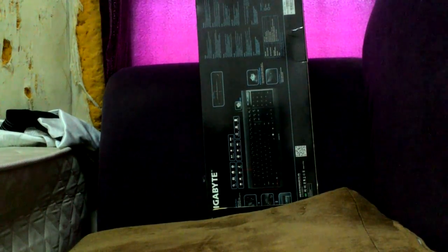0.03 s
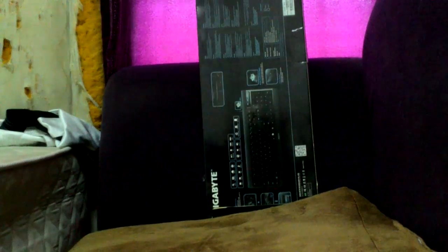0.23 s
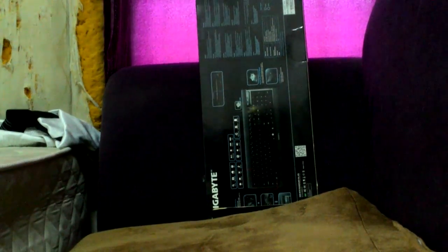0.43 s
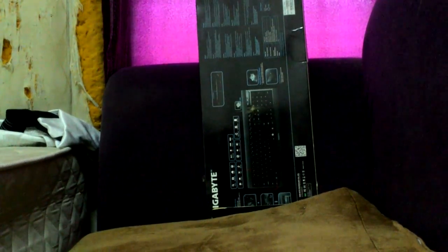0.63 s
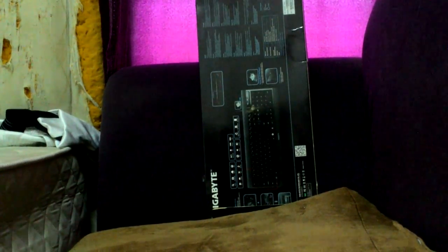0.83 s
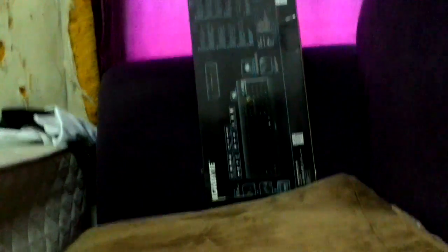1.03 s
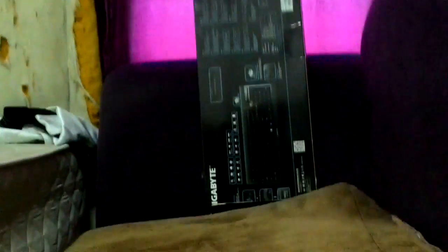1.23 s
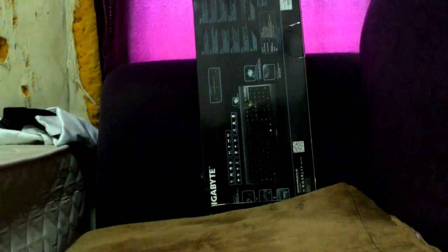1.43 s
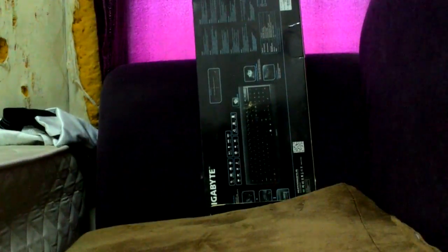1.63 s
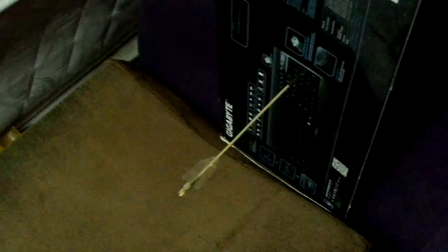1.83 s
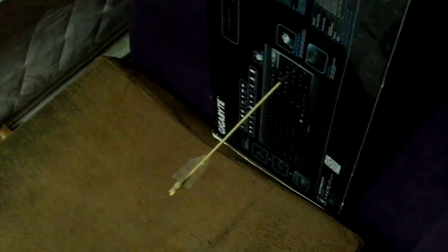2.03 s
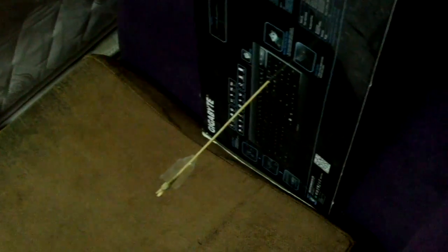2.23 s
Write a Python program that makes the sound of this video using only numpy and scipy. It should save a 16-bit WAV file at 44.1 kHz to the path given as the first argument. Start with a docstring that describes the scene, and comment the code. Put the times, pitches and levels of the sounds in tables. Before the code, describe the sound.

In a quiet furnished room, a small crossbow cracks close by, its string rattling as the bolt thumps into cardboard. After a light tap, something scrapes and clicks near the microphone over soft handling bumps.

```python
"""A small homemade crossbow is shot in a quiet furnished room. The catch slips, the string slaps and rattles
along the stock, and the frame rings. The bolt punches into a cardboard box, and a light double tap follows.
Then something slides and clicks close to the microphone, over soft bumps of the hands. Near the end the scene
changes: the background rumble and hiss stop and a quieter room tone fades in."""
import sys
import numpy as np
from scipy import signal
from scipy.fft import rfft, irfft, next_fast_len
from scipy.io import wavfile
from scipy.ndimage import uniform_filter1d, minimum_filter1d

SR = 44100
rng = np.random.default_rng(int(sys.argv[2]) if len(sys.argv) > 2 else 0)


def put_to_file(sound):
    """Save the sound as 16-bit audio at rate SR, in the file named by the first command-line argument."""
    columns = np.atleast_2d(sound).T  # one column per channel
    safe = np.clip(columns, -1, 1)
    whole_steps = np.round(safe * 32767)
    wavfile.write(sys.argv[1], SR, whole_steps.astype(np.int16))


N = 101429
T = np.arange(N) / SR
FFT_SIZE = next_fast_len(2 * N, True)
HZ = np.maximum(np.arange(FFT_SIZE // 2 + 1) * SR / FFT_SIZE, 1)

# Levels are relative. A fade_s is the time a sound takes to fall by 60 dB.
# how loud the steady noises are over time: time_s, level_db
RUMBLE_LEVELS = [(0, -47.5), (.2, -46), (.36, -61.5), (.55, -67), (.75, -55), (.93, -57.5), (1.15, -55),
                 (1.42, -58), (1.78, -58)]
HISS_LEVELS = [(0, -44), (.1, -56.5), (.23, -51.5), (.52, -66), (.8, -64), (1.4, -63), (1.78, -67)]
ROOM_TONE_LEVELS = [(1.79, -93.5), (1.83, -78.5), (2.05, -69), (2.3, -67)]
# soft bumps of the hands: start_s, level_db, rise_s, hold_s, fade_s, pitch_hz
HAND_BUMPS = [(0, -49.5, 0.0054, 0.014, 0.26, 74), (.05, -44, 0.017, .07, 0.13, 106.4),
              (0.719, -58.5, 0.017, 0.025, 0.18, 577), (0.76, -48.5, 0.059, 0.016, 0.15, 242),
              (0.99, -45.5, 0.049, 0.058, 0.22, 194.4), (1.045, -49, 0.012, 0.017, 0.41, 301),
              (1.084, -50.5, 0.028, 0.069, 0.68, 125), (1.126, -45, 0.014, 0.016, 0.577, 194.2),
              (1.259, -56.5, 0.035, 0.15, 0.74, 217), (1.361, -62, 0.035, 0.035, 0.24, 1338),
              (2.207, -70, .025, .01, .12, 114.7)]
# the catch slips, the string slaps, rebounds and buzzes: start_s, level_db, hold_s, fade_s
STRING_SLAPS = [(.2352, -24.5, 0.0058, .02), (.2387, -7.5, 0.014, 0.0073), (.2592, -16, 0.0013, .025),
                (.266, -25.5, 0.024, 0.15)]
# bright resonances that the rattle keeps singing: pitch_hz, width_hz, level_db, hold_s, fade_s
BOW_ZINGS = [(6510, 800, -14, 0.017, .09), (11600, 2600, -24, 0.044, 0.043)]
# the ringing notes of the frame and of the box: pitch_hz, level_db, fade_s
FRAME_NOTES = [(355, -15, .065), (1105, -35, .3), (1179, -31, .4), (1535, -32, .22), (2236, -35, .3),
               (2713, -33, .36), (4048, -29, .27), (5312, -24, .23), (6182, -19, .21), (6793, -25, .2),
               (6885, -27, .23), (7157, -28, .22), (10450, -30, .17)]
BOX_NOTES = [(87.85, -24.5, 0.043), (134.2, -20.5, 0.057), (200, -16, .03), (568, -25.5, 0.051),
             (810, -33.5, 0.086)]
# the bolt cracks into the cardboard: start_s, level_db, hold_s, fade_s
BOLT_CRACKS = [(.2831, -19.5, 0.00047, 0.0059), (.2842, -13, 0.0018, 0.0019), (.2894, -11, 0.00038, 0.003),
               (.2929, -12.5, 0.00053, 0.019)]
# two light taps, further off: start_s, level_db, hold_s, fade_s
LIGHT_TAPS = [(.4758, -37.5, 0.0012, 0.034), (.4850, -43, 0.0014, 0.039)]
# sliding strokes: start_s, level_db, rise_s, hold_s, fade_s, brightness_db_per_octave
RUB_STROKES = [(1.026, -33.5, 0.0061, 0.0081, 0.047, -1.5), (1.043, -42.5, 0.006, 0.017, 0.1, 0),
               (1.069, -38, .007, 0.0057, 0.15, -3), (1.087, -34.5, 0.019, 0.036, 0.05, -2),
               (1.142, -31, 0.0068, 0.011, 0.035, -2.5), (1.161, -46, 0.006, 0.014, 0.17, 1),
               (1.194, -41.5, 0.021, 0.029, 0.21, 0.5), (1.291, -46.5, 0.025, 0.015, 0.31, 5)]
# sharp snags in the slide: start_s, level_db, hold_s, fade_s
RUB_SNAGS = [(1.1238, -20.5, 0.00024, 0.001), (1.1245, -10, 0.00044, 0.0046),
             (1.1566, -27.5, 0.00029, 0.0036)]

# the colour of each noise, or how strong it is from low to high: pitch_hz, level_db
RUMBLE_COLOUR = [(25, -14.5), (200, -1.5), (300, -3), (390, -7.5), (1300, -14), (5000, -32), (9000, -66)]
HISS_COLOUR = [(1500, -8.5), (3500, -3.5), (7000, 3), (8500, -4.5), (11000, -1)]
SLAP_COLOUR = [(59, -58), (100, -26.5), (340, -11.5), (668, -16), (1310, -11), (1700, -10.5), (2180, -10),
               (2990, -12.5), (6300, -3.5), (8500, -9), (15500, -18.5)]
CRACK_COLOUR = [(80, -13), (200, -6), (420, -10), (900, 0.5), (2400, -5.5), (6500, -2), (8500, -6.5),
                (11500, -4), (15500, -21.5)]
TAP_COLOUR = [(300, -23), (1000, -1), (3500, 2.5), (6000, 0.5), (8500, -11.5), (15000, -46)]
RUB_COLOUR = [(2000, -49), (4500, -19.5), (5700, -14), (6700, -3.5), (11600, -1), (13000, -17),
              (15000, -51)]
SNAG_COLOUR = [(1000, -42), (3000, -29), (4600, -15), (7000, -5.5), (8000, -19.5), (9000, 10.5),
               (11000, -10.5), (14000, -40.5)]
ROOM_TONE_COLOUR = [(25, -19), (130, -6), (850, -13.5), (3400, -31), (8700, -33), (15500, -25.5)]

# the room's echo, band by band: pitch_hz, level_db, fade_s
ECHO_BANDS = [(119.9, -27, 0.18), (400, -18.5, 0.39), (917, -6.5, 0.26), (2000, -5.5, 0.39),
              (3700, -8, .37), (6540, -7, 0.41), (9400, -11.5, 0.098), (14000, -17.5, 0.15)]
# how alike left and right are (1 = the same) for room, close and shot sounds: pitch_hz, likeness
ROOM_LIKENESS = [(1000, 0.99), (3000, .88), (6000, 0.62), (11000, 0.94)]
CLOSE_LIKENESS = [(1000, 0.88), (6000, 0.61), (11000, 1)]
SHOT_LIKENESS = [(150, .94), (1200, .97), (3000, .9), (6000, .88), (11000, .7)]
# how far the right channel runs ahead of the left: pitch_hz, lead_radians
RIGHT_LEAD = [(1000, 0), (3000, .19), (6000, .7), (10000, 1.3), (14000, 1.9)]

DROP_S, DROP_FADE_S = 1.787, 0.017   # when the background is gone, and how fast it goes
BOW_ECHO_DB, HIT_ECHO_DB, RUB_ECHO_DB = -10.5, 2.5, -17.5   # how strongly each feeds the echo


def from_db(db):
    """Turn decibels into a gain to multiply by."""
    return 10 ** (np.asarray(db) / 20)


def unit_level(x):
    """Scale to an average (rms) level of 1."""
    return x / np.sqrt(np.mean(x ** 2) + 1e-20)


def at_hz(points):
    """Read a table at every frequency, on a log scale."""
    hz, value = np.transpose(points)
    return np.interp(np.log(HZ), np.log(hz), value)


def colour(points):
    """Gain per frequency from a colour table."""
    return from_db(at_hz(points))


def level(points):
    """Gain over time from a table of levels."""
    return from_db(np.interp(T, *np.transpose(points)))


def filtered(x, gain):
    """Filter a sound by a gain per frequency."""
    return irfft(rfft(x, FFT_SIZE) * gain, FFT_SIZE)[..., :N]


def peak(hz, width_share):
    """Gain per frequency of one resonance, its width a share of its pitch."""
    return 1 / (1 + ((HZ / hz - hz / HZ) / width_share) ** 2)


def resonances(spread_db, spacing_hz=91):
    """Gain per frequency of many small resonances of random strength."""
    pitches = np.arange(0, SR / 2, spacing_hz)
    strengths = rng.standard_normal(N)[:len(pitches)].clip(-2, 2)
    return unit_level(from_db(spread_db * np.interp(HZ, pitches, strengths)))


def noise(gain, likeness, contacts_per_s=None):
    """Filtered stereo noise, either smooth or made of tiny contacts."""
    x = rng.standard_normal((2, N))
    if contacts_per_s:
        x = np.sign(x) * (rng.random(N) < contacts_per_s / SR)
    alike = np.clip(at_hz(likeness), -1, 1)
    mid, side = filtered(x, gain * np.sqrt([1 + alike, 1 - alike]))
    return unit_level(np.array([mid + side, mid - side]))


def envelope(start_s, db, rise_s, hold_s, fade_s):
    """Gain over time that rises, holds and dies away."""
    rise = np.clip((T - start_s) / rise_s, 0, 1)
    return rise * from_db(db - 60 * np.maximum(T - start_s - rise_s - hold_s, 0) / fade_s)


def blows(rows, rise_s):
    """Gain over time of a series of short blows."""
    return sum(envelope(start, db, rise_s, hold, fade) for start, db, hold, fade in rows)


def ring(start_s, notes):
    """Pure tones struck together, each fading at its own rate."""
    age = np.maximum(T - start_s, 0)
    return sum((-1) ** k * from_db(db - 60 * age / fade) * np.sin(2 * np.pi * hz * age)
               for k, (hz, db, fade) in enumerate(notes))


def background():
    """Low rumble and hiss that drop out suddenly."""
    rumble = level(RUMBLE_LEVELS) * noise(colour(RUMBLE_COLOUR), ROOM_LIKENESS)
    hiss = level(HISS_LEVELS) * noise(colour(HISS_COLOUR), ROOM_LIKENESS)
    return (rumble + hiss) * np.clip((DROP_S - T) / DROP_FADE_S, 0, 1)


def hand_bumps():
    """Each shift of the hands stirs one resonance, in mono."""
    return sum(envelope(*bump) * noise(peak(hz, width_share=0.3), CLOSE_LIKENESS)[0]
               for *bump, hz in HAND_BUMPS)


def crossbow():
    """The string rattles along the stock; its main slap rings the frame and starts a bright zing."""
    slap_s = STRING_SLAPS[1][0]
    rattle = noise(colour(SLAP_COLOUR) * resonances(spread_db=4), SHOT_LIKENESS, contacts_per_s=9000)
    zing = 0
    for hz, width, db, hold, fade in BOW_ZINGS:
        singing = noise(peak(hz, width / hz) * resonances(spread_db=4), SHOT_LIKENESS)
        zing += singing * envelope(slap_s, db, rise_s=0.0024, hold_s=hold, fade_s=fade)
    frame = from_db(-2) * ring(slap_s, FRAME_NOTES)
    return rattle * blows(STRING_SLAPS, rise_s=0.0014) + zing + frame


def bolt_hit():
    """The bolt cracks the cardboard, and the box thumps as its panel gives way."""
    cracks = noise(colour(CRACK_COLOUR), SHOT_LIKENESS) * blows(BOLT_CRACKS, rise_s=0.0002)
    thump = from_db(-1) * ring(start_s=0.2858, notes=BOX_NOTES)
    return cracks + thump


def double_tap():
    """Two short bursts of noise sound like light, woody taps."""
    return noise(colour(TAP_COLOUR), ROOM_LIKENESS) * blows(LIGHT_TAPS, rise_s=0.0013)


def sliding_rub():
    """Each stroke rubs a new spot with its own bright colour; snags make small clicks."""
    strokes = 0
    for *stroke, brightness in RUB_STROKES:
        spot = from_db(at_hz(RUB_COLOUR) + brightness * np.log2(HZ)) * resonances(spread_db=8.5)
        strokes += noise(spot, CLOSE_LIKENESS, contacts_per_s=6800) * envelope(*stroke)
    clicks = noise(colour(SNAG_COLOUR), CLOSE_LIKENESS) * blows(RUB_SNAGS, rise_s=0.0001)
    return strokes + clicks


def room_tone():
    """A quiet, centred hush with a faint wavering hum fades in after the drop."""
    hum = from_db(-4) * noise(peak(hz=301.5, width_share=0.013), ROOM_LIKENESS)[0]
    hush = noise(colour(ROOM_TONE_COLOUR), ROOM_LIKENESS)[0]
    return level(ROOM_TONE_LEVELS) * (hush + hum) * (T > DROP_S)


def room_echo(sound, delay_s=0.0026, build_s=0.0084):
    """Sound bounces off nearby furniture, then dies away at its own rate in each band."""
    wash = noise(1, ROOM_LIKENESS)
    build = np.clip((T - delay_s) / build_s, 0, 1)

    def dying(db, fade_s):
        decay = build * from_db(-60 * T / fade_s)
        return from_db(db) * decay / np.sqrt(np.sum(decay ** 2))

    echo = noise(1, ROOM_LIKENESS) * dying(db=-17.5, fade_s=0.15)   # the furniture
    for band_hz, db, fade in ECHO_BANDS:
        band = at_hz([(hz, float(hz == band_hz)) for hz, _, _ in ECHO_BANDS])
        echo += filtered(wash, band) * dying(db, fade)
    return filtered(sound.mean(axis=0), rfft(echo, FFT_SIZE))


def scene():
    """All the sounds in the room; near ones reach the right microphone slightly first."""
    bow = crossbow()
    hits = bolt_hit() + double_tap()
    rub = sliding_rub()
    echo = room_echo(from_db(BOW_ECHO_DB) * bow + from_db(HIT_ECHO_DB) * hits + from_db(RUB_ECHO_DB) * rub)
    lead = 0.5j * at_hz(RIGHT_LEAD) * [[-1], [1]]   # half holds left back, half moves right ahead
    near = filtered(bow + hits + rub + hand_bumps(), np.exp(lead))
    around = filtered(echo + background(), np.exp(0.73 * lead))   # sound from all round leads less
    return near + around + room_tone()


def record(dry, low_cut_hz=36, peak_limit=0.78, window_s=0.0004, high_cut_hz=16500):
    """The microphone loses deep bass, a fast limiter holds peaks down, and the top treble is cut."""
    sound = signal.sosfilt(signal.butter(2, low_cut_hz, "high", fs=SR, output="sos"), dry)
    window = int(window_s * SR)
    allowed = peak_limit / np.maximum(np.abs(sound).max(axis=0), peak_limit)
    gain = uniform_filter1d(minimum_filter1d(allowed, window), window)
    return signal.sosfilt(signal.cheby2(16, 70, high_cut_hz, fs=SR, output="sos"), sound * gain)


dry = scene()
out = record(dry)
put_to_file(out)
```